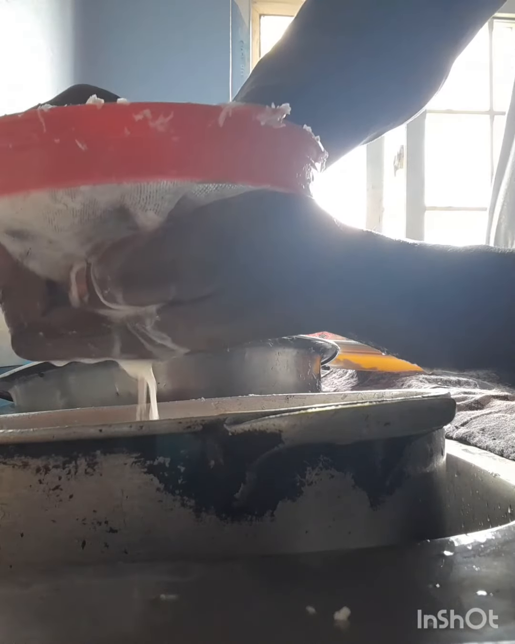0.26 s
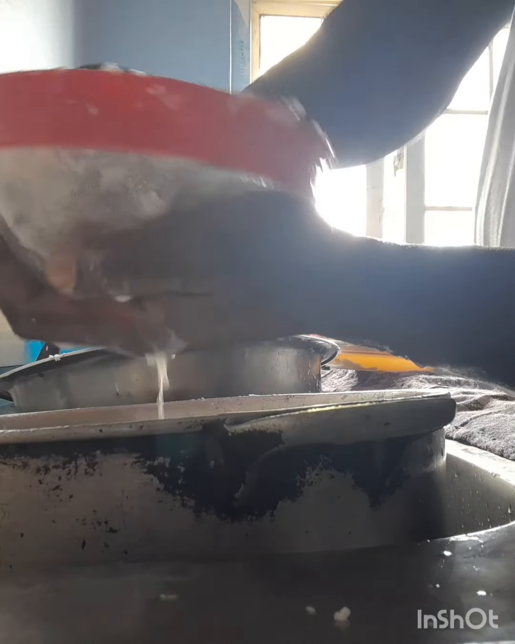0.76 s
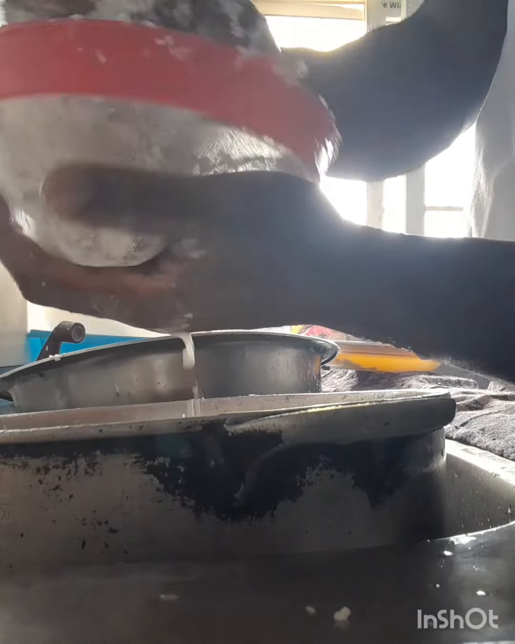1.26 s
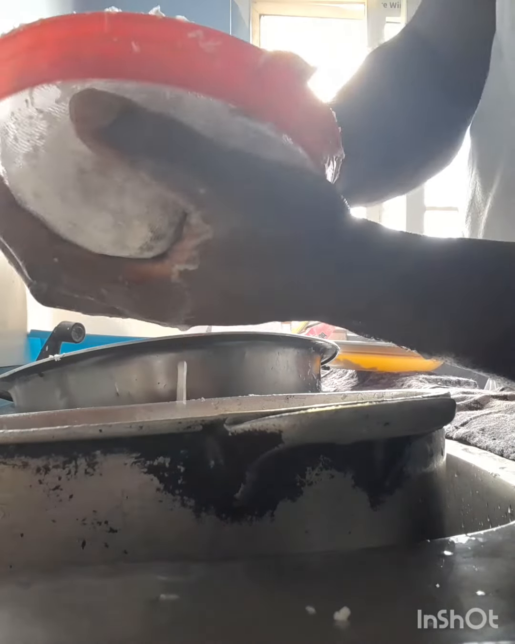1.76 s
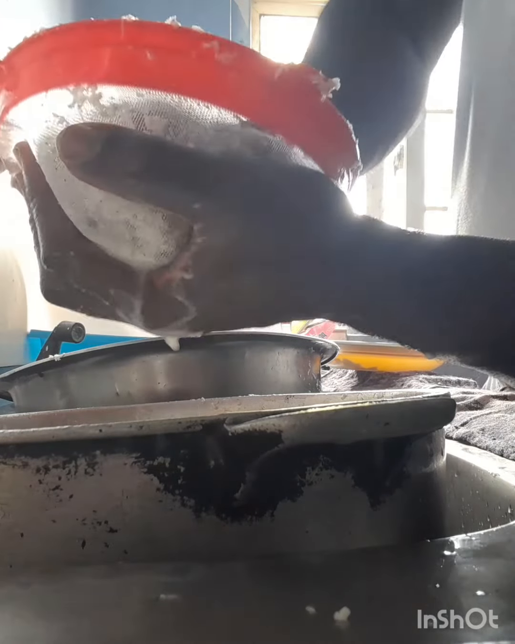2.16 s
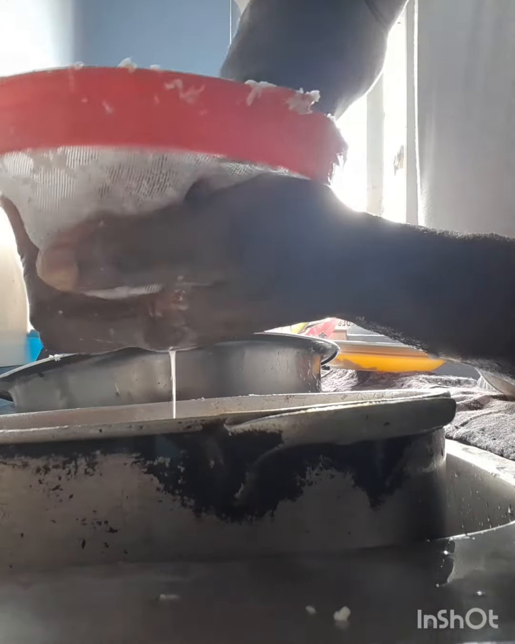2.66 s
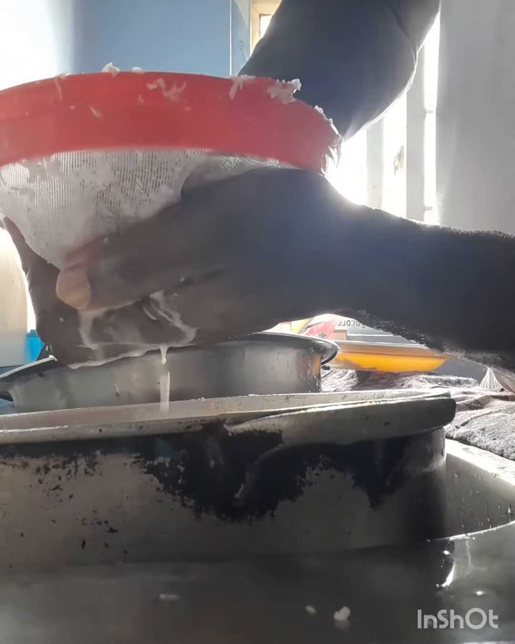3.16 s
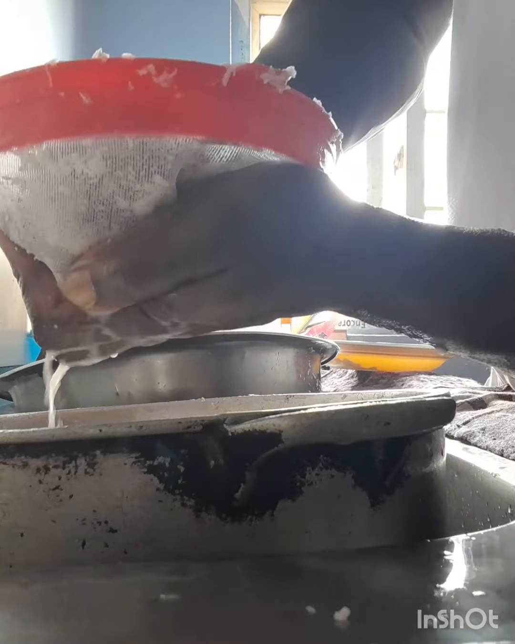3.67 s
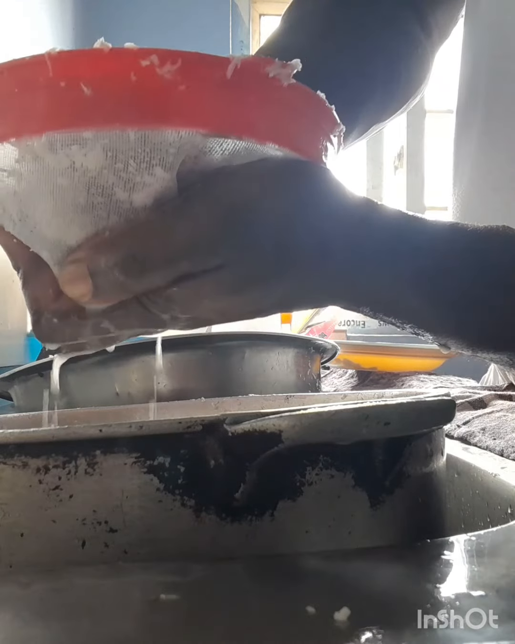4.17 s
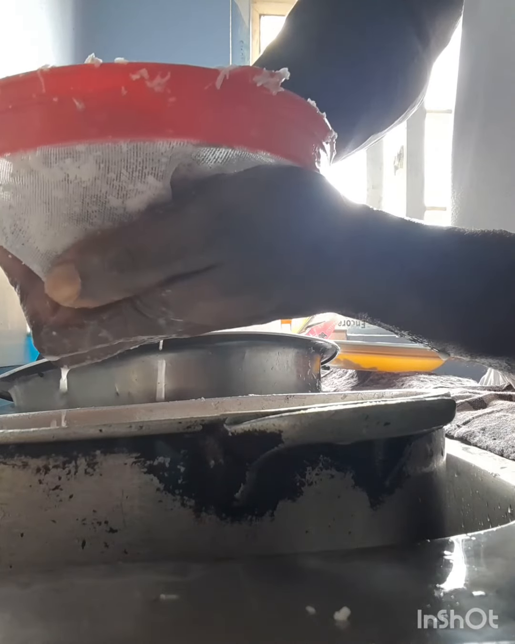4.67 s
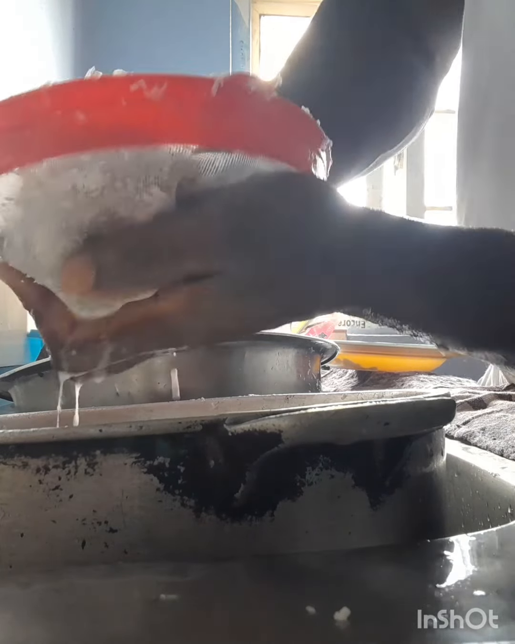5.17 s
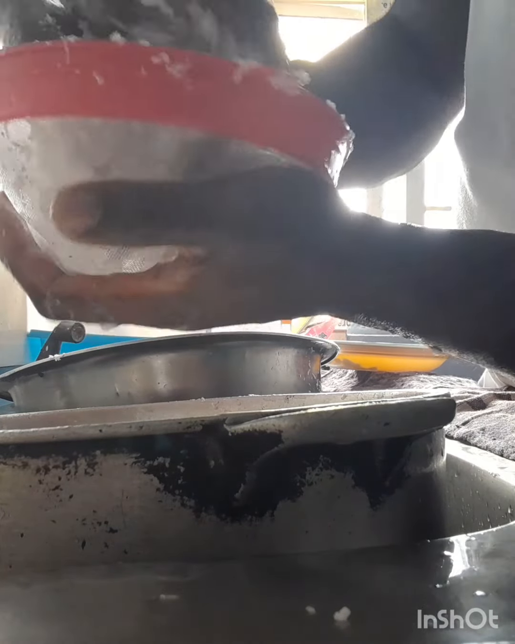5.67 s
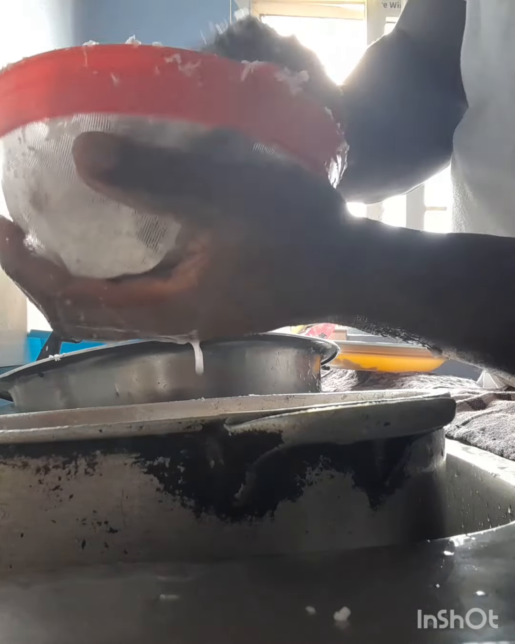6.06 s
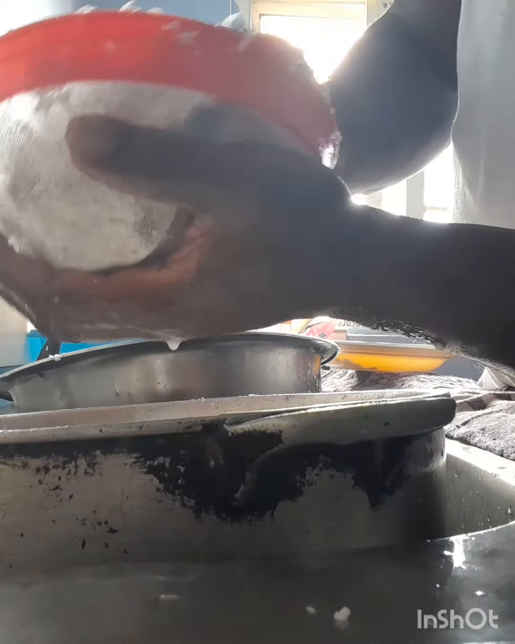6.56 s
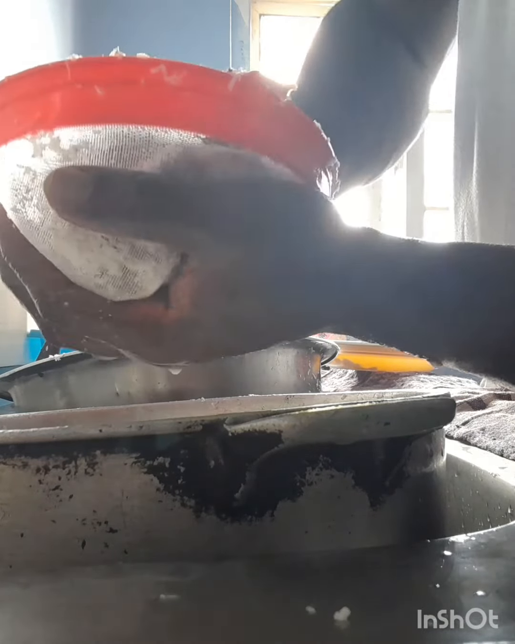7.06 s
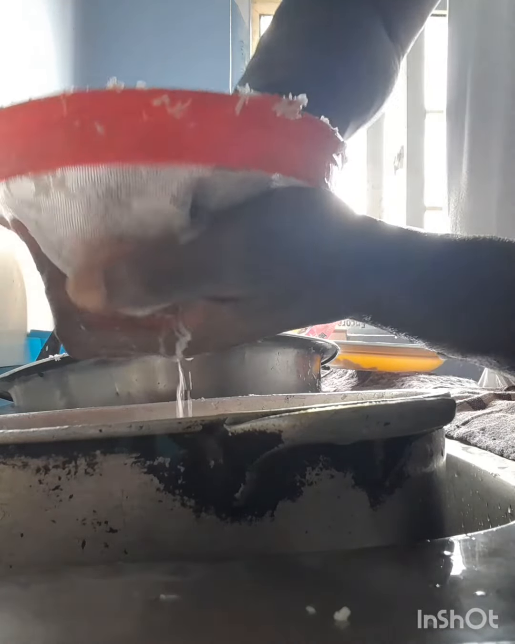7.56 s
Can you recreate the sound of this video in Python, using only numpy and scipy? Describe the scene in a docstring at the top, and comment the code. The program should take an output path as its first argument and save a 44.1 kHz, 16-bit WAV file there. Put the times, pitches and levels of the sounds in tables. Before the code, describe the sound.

Hands rub grated coconut in a wet cloth over a strainer, making close, bright rasping strokes, about seven a second, from start to finish. Milk drips into a pot with small plinks, most often at the start, and each squeeze adds a soft, low rumble. Near the end a vessel is bumped and rings dully. The kitchen is small and hard-walled, with a faint hum.

```python
"""Coconut milk is wrung from a wet cloth full of grated coconut in a small, hard-walled kitchen.
From the start, quick scrubbing strokes rasp close by, about seven a second, as fibres catch and slip.
Milk drips through a strainer into a pot, trapping bubbles that ring; each squeeze rumbles softly.
The clear drops thin out, and near the end a vessel is knocked and rings dully.
The scrubbing carries on to the last, over faint room air and hum."""
import sys
import numpy as np
from scipy import signal
from scipy.fft import rfft, irfft, next_fast_len
from scipy.io import wavfile
from scipy.ndimage import uniform_filter1d

SR = 44100
rng = np.random.default_rng(int(sys.argv[2]) if len(sys.argv) > 2 else 0)


def output_pcm(signal):
    """Save a mono or channel-first signal as 16-bit PCM at the path in sys.argv[1].

    Samples are clipped to [-1, 1] before scaling.
    """
    pcm = np.clip(np.atleast_2d(signal).T, -1, 1) * 32767
    wavfile.write(sys.argv[1], SR, np.round(pcm).astype(np.int16))


N = 344862
TIME = np.arange(N) / SR


def scrubbing(level_db=0.5, rest_db=-38.5, usual_db=-25, coarse_per_db=0.29, coarse_hz=5200):
    """Each stroke swells and fades with its speed; the contact never quite rests between strokes."""
    # stereo lean of the rasp: (frequency [Hz], left minus right [dB])
    balance = [(500, 0), (2400, 4), (3400, -1), (5000, -3), (6200, -3.5), (7200, -7.5), (8200, 2),
               (9000, 1.5), (15400, -2.5)]
    rows = strokes()
    # light strokes carry a larger share of low rasp, hard ones a smaller share
    low_rows = [(s, db + coarse_per_db * (usual_db - db), length) for s, db, length in rows]
    rasp = fibre_rasp()
    low = signal.sosfiltfilt(signal.butter(3, coarse_hz, fs=SR, output="sos"), rasp)
    stroked = low * swells(low_rows, rest_db) + (rasp - low) * swells(rows, rest_db)
    left, right = kitchen(stroked, near_db=-4.5, room_db=-6.5)
    return amp(level_db) * np.array([coloured(left, balance, 1 / 2), coloured(right, balance, -1 / 2)])


def strokes(tiring=0.75, snap_per_db=0.0482):
    """The pace holds through a bout while the force slides: rows of (middle [s], level [dB], length [s])."""
    # bouts of scrubbing, many starting hard and tiring: (first stroke [s], last stroke [s],
    # strokes [count], first level [dB], last level [dB], base stroke length [s])
    bouts = [(0.005, 0.146, 2, -22.8, -20.7, .098), (0.243, 0.329, 2, -22.8, -25.4, .064),
             (0.466, 0.777, 3, -25.5, -26.7, .087), (0.928, 1.035, 2, -23.3, -21.5, .078),
             (1.172, 1.465, 3, -27.6, -28.8, .088), (1.588, 1.694, 2, -20.7, -23.4, .063),
             (1.842, 1.992, 2, -24.7, -22.2, .077), (2.116, 2.24, 2, -24, -23.3, .074),
             (2.391, 2.466, 2, -27.9, -27.3, .06), (2.598, 2.718, 2, -23.2, -25.5, .105),
             (2.843, 2.989, 2, -18.3, -20.5, .078), (3.108, 3.24, 2, -21.8, -23.3, .077),
             (3.3, 3.924, 7, -24, -28.5, .071), (4.066, 4.303, 3, -22.3, -26.2, .08),
             (4.428, 4.677, 3, -20.3, -24, .08), (4.842, 5.104, 3, -26.3, -26.5, .072),
             (5.226, 5.376, 2, -22.5, -26.5, .082), (5.541, 5.772, 3, -22.5, -28.3, .08),
             (5.929, 6.212, 3, -22.4, -21.7, .081), (6.346, 6.435, 2, -23.8, -18.4, .06),
             (6.536, 6.888, 4, -22.2, -22.4, .073), (7.008, 7.083, 2, -27.6, -30.7, .056),
             (7.196, 7.437, 3, -23, -22.3, .081), (7.556, 7.757, 3, -28.8, -27.5, .088)]
    rows = []
    for first, last, count, first_db, last_db, length in bouts:
        for along in np.linspace(0, 1, count):
            db = first_db + (last_db - first_db) * along ** tiring  # the force changes most early on
            snap = np.exp(snap_per_db * ((first_db + last_db) / 2 - db))  # harder strokes are quicker
            rows.append((first + (last - first) * along, db, length * snap))
    return rows


def fibre_rasp(ring_db=-12.5, ring_t60=0.08, chatter_db=0.65, chatter_s=0.0048):
    """Fibres catch and let go in clumps; every slip also sets a few thin metallic modes ringing."""
    # bright colour of the rasp: (frequency [Hz], gain [dB])
    colour = [(200, -31), (850, -26), (1200, -23.5), (1850, -21), (2300, -15.5), (4800, -7.5), (5600, -7),
              (7100, -1), (8000, -4), (9000, -12.5), (15400, -9)]
    # metallic modes under the strokes: (frequency [Hz], relative level [dB])
    modes = [(6353, -14), (6492, -1), (6824, 1.5), (7199, -7), (7331, 10.5)]
    clumps = evened(uniform_filter1d(rng.standard_normal(N), round(chatter_s * SR)))
    slips = evened(snags(per_s=12000, spread_db=3.0) * amp(chatter_db * clumps))
    t = TIME[:SR // 5]
    ping = sum(amp(db - 60 * t / ring_t60) * np.sin(2 * np.pi * hz * t) for hz, db in modes)
    ring = evened(signal.oaconvolve(slips, ping[None], axes=1)[:, :N])
    return evened(shifting_pressure(coloured(slips, colour))) + amp(ring_db) * ring


def snags(per_s, spread_db):
    """Tiny slips of fibres: random clicks, a few much larger than the rest."""
    size = amp(spread_db * np.minimum(rng.exponential(1, (2, N)), 4))
    return evened(size * rng.choice([-1, 1], (2, N)) * (rng.random((2, N)) < per_s / SR))


def shifting_pressure(x, patchy_db=1.3, patch_frames=20, patch_bins=5):
    """The colour drifts in patches as the pressure moves over the wet surface."""
    spectra = signal.stft(x, nperseg=256)[2]
    _, bins, frames = spectra.shape
    drift = uniform_filter1d(rng.standard_normal((frames, bins)), patch_frames, axis=0)
    patches = evened(uniform_filter1d(drift, patch_bins, axis=1))
    return signal.istft(spectra * amp(patchy_db * patches.T), nperseg=256)[1][:, :N]


def dripping(level_db=3.5, left_db=1.0, small_db=-48.5, low_hz=800, high_hz=2600):
    """Milk falls into the pot: clear plinks over a patter of small drops."""
    # drops that trap a bubble: (time [s], relative level [dB], starting pitch [Hz])
    drops = [(.001, -30, 1507), (.049, -32.5, 1615), (.114, -43, 870), (.176, -46, 674),
             (.206, -38.5, 1570), (.265, -42, 1240), (.425, -44, 1053), (.486, -42.5, 1145),
             (.558, -33, 970), (1.064, -40, 1550), (1.087, -36, 1800), (1.199, -23.5, 3210),
             (1.375, -42.5, 1060), (2.451, -25.5, 1703), (3.257, -33, 1845), (3.490, -34, 1580),
             (3.553, -32, 1690), (3.798, -42, 1490), (3.888, -40.5, 1510), (3.973, -36.5, 1505),
             (5.275, -37, 1730)]
    milk = np.zeros(N)
    for s, db, hz in drops:
        add(milk, s, bubble(db, hz, t60=0.1 * (1000 / hz) ** 1.1))  # smaller, higher bubbles die sooner
    for when, size, pitch in rng.random((70, 3)):
        hz = low_hz * (high_hz / low_hz) ** pitch
        add(milk, when * N / SR, 2 * size * bubble(small_db, hz, t60=0.038))
    return kitchen(milk, near_db=0, room_db=-9.5, paths=2) * amp([[level_db + left_db], [level_db - left_db]])


def bubble(db, hz, t60, surfacing_s=0.072, onset_s=0.00088, splash_db=-8, splash_s=0.0036):
    """A soft splash, then the trapped bubble rings and chirps upward as it nears the surface."""
    t = TIME[:SR // 5]
    pitch = hz * (1 + np.minimum((t / surfacing_s) ** 2, 1 / 3))
    tone = amp(-60 * t / t60) * np.sin(2 * np.pi * np.cumsum(pitch) / SR)
    band = signal.butter(1, [hz / 2, hz * 2], "band", fs=SR, output="sos")
    splash = evened(signal.sosfilt(band, rng.standard_normal(len(t)))) * np.exp(-t / splash_s)
    return amp(db) * (1 - np.exp(-t / onset_s)) * (tone + amp(splash_db) * splash)


def knocking(thud_t60=0.11, thud_hz=1050, rise_s=0.0029):
    """Blows ring the vessel's modes with a short thud; a softer, longer contact dulls the high ones."""
    # knocks on the vessel: (time [s], relative level [dB], contact time [s])
    knocks = [(6.812, -41, .0001), (6.874, -33.5, 0.00048), (6.883, -37.5, 0.00068), (6.995, -40, 0.00068)]
    # modes of the vessel: (frequency [Hz], relative level [dB], t60 [s])
    modes = [(111, -4.5, 0.51), (130, 1, .15), (371, 0, 0.16), (430, -3.5, 0.35), (526, 8, 0.067),
             (667, -5, 0.38), (924, 11, 0.074)]
    out, t = np.zeros(N), TIME[:SR // 2]
    body = signal.butter(3, [modes[0][0], thud_hz], "band", fs=SR, output="sos")
    for s, db, contact in knocks:
        ring = sum(amp(mode_db - 60 * t / t60) * np.sin(2 * np.pi * hz * t) / (1 + (2 * hz * contact) ** 2)
                   for hz, mode_db, t60 in modes)
        thud = evened(signal.sosfilt(body, rng.standard_normal(len(t)))) * amp(-60 * t / thud_t60)
        add(out, s, amp(db) * (1 - np.exp(-t / rise_s)) * (ring + thud) / 2)
    return kitchen(out, near_db=-15, room_db=-12, paths=2)


def wringing(hold_db=-65.5, right_db=1.5):
    """Hands knead the cloth: a low rumble that swells with each squeeze."""
    # dark colour of the kneading: (frequency [Hz], gain [dB])
    colour = [(20, -33), (60, -11), (85, -8), (112, 0), (170, -4.5), (230, -5), (320, -14.5), (2000, -31.5)]
    # squeezes of the cloth: (middle [s], level [dB], length [s])
    squeezes = [(.2, -59.5, .35), (.66, -55, 0.17), (.97, -53, 0.17), (1.8, -64, .4), (2.42, -54.5, .28),
                (2.9, -58, 0.39), (4.46, -55, 0.22), (4.82, -57, 0.29), (5.37, -59.5, 0.23),
                (6.6, -58, 0.55)]
    return centred_noise(colour) * swells(squeezes, hold_db) * amp([[-right_db], [right_db]])


def hum(waver_hz=1.4):
    """Faint low tones, each wavering a little in pitch."""
    # tones of the hum: (frequency [Hz], level [dB])
    tones = [(107.7, -77), (226.1, -73.5), (656.8, -69.5)]
    wavers = evened(uniform_filter1d(rng.standard_normal((len(tones), N)), SR // 10))
    return sum(amp(db) * evened(np.sin(2 * np.pi * np.cumsum(hz + waver_hz * waver) / SR))
               for (hz, db), waver in zip(tones, wavers))


def room_air(level_db=-58):
    """The air of the room: a soft, steady bed of noise."""
    # colour of the room tone: (frequency [Hz], gain [dB])
    colour = [(20, -23), (100, -3), (250, 3.5), (330, -3), (640, 4.5), (800, -26), (1500, -4),
              (15000, -17.5)]
    return amp(level_db) * centred_noise(colour)


def kitchen(x, near_db, room_db, paths=4, move_hz=1.7, near_delay_s=0.0012, room_delay_s=0.006):
    """Direct sound, quick reflections from pots and counter, then the tail of the room."""
    # decay of the hard-walled room: (frequency [Hz], t60 [s])
    room_decay = [(150, 0.16), (1000, 0.76), (6000, 0.2), (15000, 0.11)]
    near_decay = [(1, 0.037)]  # the same short t60 in every band
    out = x * np.ones((2, 1))
    for k in range(paths):
        # moving arms change the paths: several sets of reflections take turns
        turn = (move_hz * TIME + k / paths) % 1 * paths
        share = np.sin(np.pi / 2 * turn) * (turn < 2)
        near = amp(near_db) * reflections(near_decay, near_delay_s)
        room = amp(room_db) * reflections(room_decay, room_delay_s)
        out += signal.oaconvolve(np.atleast_2d(x * share), near + room, axes=1)[:, :N]
    return out / np.sqrt(1 + amp(near_db) ** 2 + amp(room_db) ** 2)


def reflections(decay, delay_s):
    """A left and a right train of echoes, of energy 1, each band dying at its own speed."""
    hz, t, spectra = signal.stft(rng.standard_normal((2, 16384)), SR, nperseg=128)
    tail = signal.istft(spectra * amp(-60 * t / read(decay, hz)[:, None]), SR, nperseg=128)[1]
    return np.roll(tail / np.linalg.norm(tail, axis=1, keepdims=True), round(delay_s * SR), axis=1)


def centred_noise(colour, side_db=-21):
    """Coloured noise, nearly alike left and right."""
    mid, side = coloured(rng.standard_normal((2, N)), colour)
    return evened(np.array([mid + amp(side_db) * side, mid - amp(side_db) * side]))


def swells(rows, rest_db):
    """Smooth rises and falls over a resting level, from rows of (middle [s], level [dB], length [s])."""
    t = TIME[::32]
    power = sum(amp(db) ** 2 * np.exp(-(2 * (t - s) / length) ** 2) for s, db, length in rows)
    return np.interp(TIME, t, np.sqrt(amp(rest_db) ** 2 + power))


def coloured(x, curve, depth=1):
    """Equalises by a dB curve, scaled by depth."""
    size = next_fast_len(N, True)
    gain = amp(depth * read(curve, np.fft.rfftfreq(size, 1 / SR)))
    return irfft(rfft(x, size) * gain, size)[..., :N]


def read(curve, hz):
    """Reads a table on a log-frequency axis."""
    curve_hz, value = np.transpose(curve)
    return np.interp(np.log(hz + 1), np.log(curve_hz + 1), value)


def add(mix, s, sound):
    """Mixes a sound in at time s."""
    part = mix[round(s * SR):][:len(sound)]
    part += sound[:len(part)]


def amp(db):
    """Decibels to amplitude."""
    return 10 ** (np.asarray(db) / 20)


def evened(x):
    """Scales to rms 1."""
    return x / np.sqrt(np.mean(x ** 2) + 1e-20)


def scene():
    """Scrubbing up front; drips, knocks and wringing behind it; hum and air underneath."""
    return scrubbing() + dripping() + knocking() + wringing() + hum() + room_air()


def record(dry):
    """A steep high cut takes off the very top of the treble."""
    high_cut = signal.firwin(1023, 15520, window=("kaiser", 9), fs=SR)
    return signal.oaconvolve(dry, high_cut[None], "same")


dry = scene()
out = record(dry)
output_pcm(out)
```